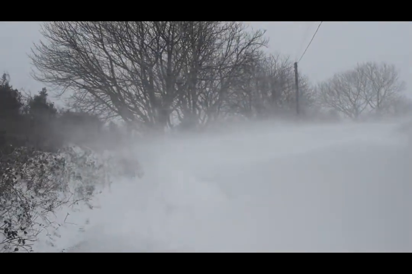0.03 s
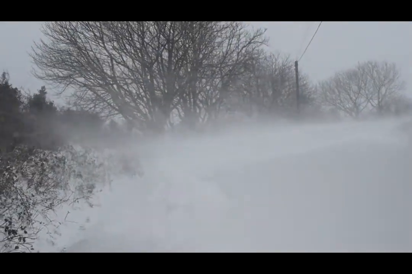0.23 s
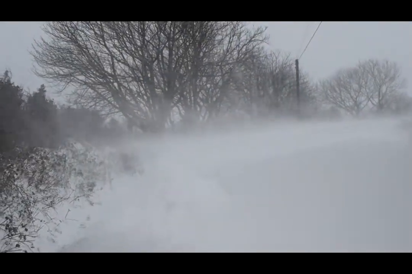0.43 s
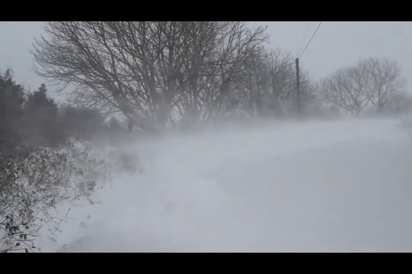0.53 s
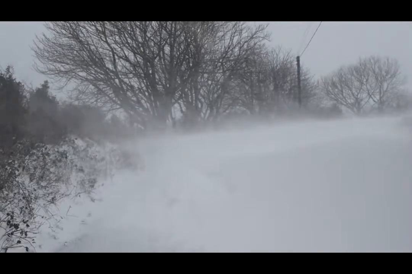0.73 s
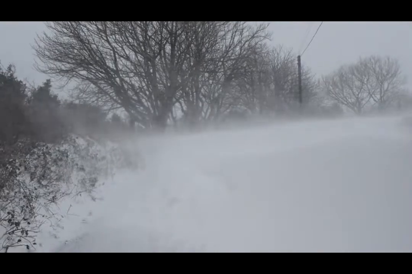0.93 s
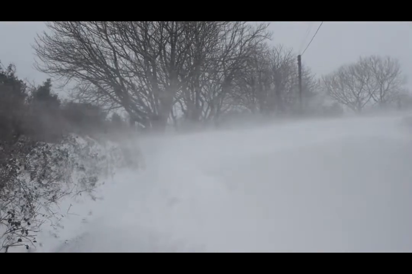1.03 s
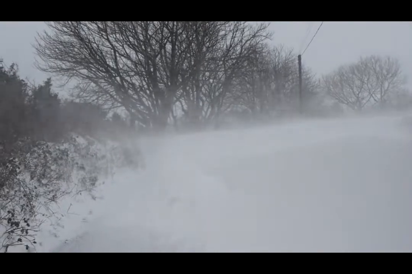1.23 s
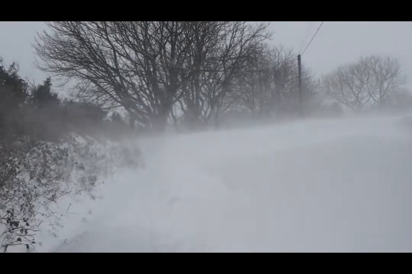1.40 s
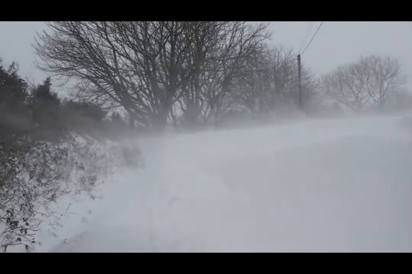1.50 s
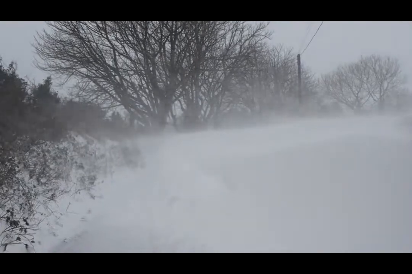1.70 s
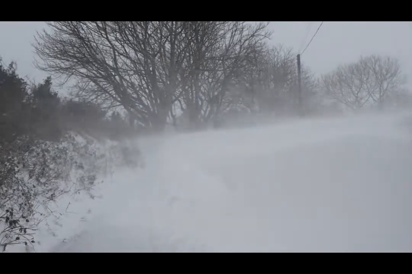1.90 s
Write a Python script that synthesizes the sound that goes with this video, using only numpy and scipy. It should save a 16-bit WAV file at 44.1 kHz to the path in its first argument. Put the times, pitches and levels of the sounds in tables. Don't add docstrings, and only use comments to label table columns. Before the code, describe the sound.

Wind buffets a small camera microphone on a snowy road. A low flutter opens over airy roar and snow hiss; from 0.2 to 0.5 s hard, distorted thumps tear at the right side. A strong gust hits at 0.7-0.8 s, more at 0.9 with a sharp snap at 0.96, then blows at 1.33 and 1.47-1.6. The background ducks under gusts, then creeps back as light left-side flutters end it.

```python
import sys
import numpy as np
from scipy import signal
from scipy.io import wavfile
from scipy.ndimage import uniform_filter1d

SR = 44100
rng = np.random.default_rng(int(sys.argv[2]) if len(sys.argv) > 2 else 0)


def decibels_to_gain(level_db):
    exponent = np.asarray(level_db, float) / 20
    return 10 ** exponent


def store_pcm(level_fs):
    pcm = np.round(np.clip(level_fs, -1, 1) * 32767).astype(np.int16)
    wavfile.write(sys.argv[1], SR, np.atleast_2d(pcm).T)


N = 85995

# (frequency [Hz], density [dB per Hz])
ROAR_SPECTRUM = [(250, -4), (500, -5), (1050, 1.5), (1350, -3.5), (1900, -4.5), (5200, -18), (8300, -16.5),
                 (15500, -33.5)]
# (frequency [Hz], correlation [-1 to 1])
ROAR_LIKENESS = [(60, -0.08), (180, -0.67), (550, 1), (1650, 0.58), (4970, -0.25), (15000, 0.074)]
# (time [s], lift [dB])
SNOW_DRIFT = [(0, 0), (.08, 0), (.16, 3), (.22, 1), (.35, 2), (.39, 9), (.44, 2), (.56, -3), (.82, 1),
              (.885, 4), (.96, 0), (1.1, 1), (1.14, 4), (1.21, 0), (1.45, 1), (1.5, 5), (1.6, 2),
              (1.95, -1)]
# (time [s], peak level [dB], left minus right [dB])
SNOW_GRAINS = [
    (0.329, -33.5, -22),
    (1.124, -40, -12),
    (1.169, -45, -4),
    (1.327, -40, -20),
    (1.484, -33, -4),
    (1.507, -31.5, -9),
    (1.59, -41, -27),
]
# (time [s], peak level [dB], corner frequency [Hz])
SHARP_EDDIES = [(.214, 5.5, 650), (.217, 15.5, 750), (0.303, 5, 1500), (0.329, 4, 2000), (0.375, 9.5, 1480),
                (.398, 2.5, 1280), (0.466, -3, 1830), (.479, -7, 500), (.64, -5.5, 604), (0.861, -3, 650),
                (0.959, 18, 1190), (0.9888, 3.5, 1510), (.991, -9, 700), (1.003, -5.5, 530),
                (1.051, -1.5, 1606), (1.059, -4.5, 298), (1.126, -10, 604), (1.157, -5, 960),
                (1.298, -3.5, 450), (1.321, 0, 630), (1.333, -1.5, 920), (1.4648, 6, 1020),
                (1.467, -1.5, 1100), (1.524, 5.5, 970), (1.619, -16, 610)]
# (start [s], length [s], level after gain control [dB], eddy corner [Hz])
LEFT_GUSTS = [(.12, .15, -30, 152), (.31, 0.033, -20.5, 200), (.355, 0.073, -27.5, 249),
              (.39, 0.07, -46, 296), (.52, 0.016, -36, 250), (.58, 0.019, -31.5, 290),
              (.72, 0.072, -27.5, 305), (.92, 0.072, -31, 314), (1.05, .04, -40, 250),
              (1.18, .04, -40, 250), (1.26, 0.03, -33.5, 285), (1.33, 0.088, -35.5, 200),
              (1.52, 0.058, -21.5, 378), (1.552, 0.052, -21, 523), (1.62, 0.02, -29, 296),
              (1.652, 0.0068, -14, 486), (1.68, 0.011, -16.5, 360), (1.76, 0.0076, -19.5, 248),
              (1.84, 0.027, -24.5, 200), (1.93, .02, -22.5, 347)]
# (start [s], length [s], level after gain control [dB], eddy corner [Hz])
RIGHT_GUSTS = [(0, 0.11, -24.5, 200), (.152, .035, -18, 231), (.197, 0.037, -5.5, 456),
               (.236, 0.051, -2.5, 1176), (.29, 0.035, -6.5, 800), (.337, 0.025, -8.5, 580),
               (.357, 0.017, -9.5, 1370), (.372, 0.038, -12.5, 637), (.42, 0.02, -10.5, 910),
               (.443, 0.0086, -5.5, 1660), (.458, 0.021, -15.5, 733), (.485, 0.033, -29.5, 324),
               (.6, 0.096, -22.5, 240), (.702, 0.089, -2, 1190), (.793, 0.023, -17.5, 970),
               (.815, 0.17, -20.5, 200), (.878, 0.057, -11, 400), (.901, 0.057, -8, 1370),
               (.962, 0.073, -36, 252), (1.0525, 0.0031, -13, 1690), (1.043, 0.11, -21, 266),
               (1.65, 0.27, -30, 164), (1.165, 0.037, -26, 200), (1.295, 0.033, -19, 376),
               (1.33, 0.02, -7, 543), (1.355, 0.02, -16, 344), (1.444, .018, -10.5, 220),
               (1.466, 0.027, -6, 600), (1.497, .13, -14.5, 423), (1.547, 0.013, -9, 198)]
# (time [s], gain [dB])
CAMERA_GAIN = [(0, 0), (.17, 1), (.285, -13), (.44, -13), (.46, -19), (.56, -19.5), (.692, -7), (.71, -12),
               (.77, -15), (.81, -20), (.89, -17), (.95, -19), (.975, -25), (1.16, -15), (1.19, -16),
               (1.33, -9), (1.7, -7), (1.95, -1)]

ROAR_DB, PATCH_DB, FLICKER_DB = -26, 0.7, 0.8
HISS_HZ = 5570
GRAIN_HZ, GRAIN_S, GRAIN_DB = 7300, 0.0017, 3
EDDIES_PER_CYCLE, EDDY_SPREAD_DB = 1.528, 4.5
LUMP_DB, LUMP_HZ = 1, 63
FINE_DB, FINE_RATIO = -18, 2.005
RISE_CYCLES, FALL_CYCLES = 1.6, 2.5
MURMUR_LEFT_DB, MURMUR_RIGHT_DB, MURMUR_HZ = -43, -44, 200
BASS_CUT_HZ = 110
PORT_HZ, PORT_WIDTH_HZ, PORT_DB = 980, 300, -4
UPPER_HZ, UPPER_WIDTH_HZ, UPPER_DB = 1950, 700, -1
KNEE, CLIP = 2.2, 1.0


def evened(x):
    return x / np.sqrt(np.mean(x ** 2) + 1e-20)


def read(points, hz):
    f, value = np.transpose(points)
    return np.interp(np.log(hz + 1), np.log(f + 1), value)


def passed(x, hz, kind, order=2):
    return signal.sosfilt(signal.butter(order, hz, kind, fs=SR, output="sos"), x)


def ring(x, hz, width_hz):
    return signal.lfilter(*signal.iirpeak(hz, hz / width_hz, SR), x)


def roar():
    frames, hz = N // 128 + 5, np.fft.rfftfreq(512, 1 / SR)
    a, b, c, d, patches = rng.standard_normal((frames, 257, 5)).T
    patches = uniform_filter1d(patches, size=6, axis=0)
    patches = evened(uniform_filter1d(patches, size=20, axis=1))
    flicker = evened(uniform_filter1d(rng.standard_normal(frames), size=6))

    same = np.clip(read(ROAR_LIKENESS, hz), -1, 1)[:, None]
    left = a + 1j * b
    right = same * left + np.sqrt(1 - same ** 2) * (c + 1j * d)

    spectrum_db = read([(60, -31)] + ROAR_SPECTRUM, hz)[:, None]
    drift_db = np.interp(np.arange(frames) * 128 / SR, *np.transpose(SNOW_DRIFT))
    hiss_share = 1 / (1 + (HISS_HZ / (hz + 1)) ** 4)
    level_db = spectrum_db + PATCH_DB * patches + FLICKER_DB * flicker + np.outer(hiss_share, drift_db)
    noise = signal.istft(np.array([left, right]) * decibels_to_gain(level_db), nperseg=512, noverlap=384)[1][:, :N]
    return decibels_to_gain(ROAR_DB) * evened(noise)


def grains():
    t, out = np.arange(N) / SR, np.zeros((2, N))
    noise = passed(rng.standard_normal((2, N)), GRAIN_HZ, "high")
    for s, db, pan in SNOW_GRAINS:
        sides = decibels_to_gain(np.array([[db + GRAIN_DB + pan / 2], [db + GRAIN_DB - pan / 2]]))
        out += sides * (t > s) * np.exp(-abs(t - s) / GRAIN_S)
    return noise * out


def snaps():
    t, out = np.arange(N) / SR, np.zeros(N)
    signs = (-1.) ** np.arange(len(SHARP_EDDIES))
    for (s, db, hz), sign in zip(SHARP_EDDIES, signs):
        u = np.pi * hz * (t - s)
        pulse = np.exp(0.6 - np.hypot(u, 0.6)) * np.cos(1.11 * u + 0.84)
        out += sign * decibels_to_gain(db - 1) * pulse
    return out


def port(gusts, murmur_db):
    t, out = np.arange(N) / SR, np.zeros(N)
    chance = rng.random(N)
    size = rng.standard_normal(N) * decibels_to_gain(EDDY_SPREAD_DB * np.minimum(rng.exponential(1, N), 2.5))
    lumps = decibels_to_gain(LUMP_DB * evened(passed(rng.standard_normal(N), LUMP_HZ, "low")))
    murmur = (0.028, N / SR, murmur_db, MURMUR_HZ)
    for start, length, db, hz in [murmur] + gusts:
        a, b = max(int((start - 0.03) * SR), 0), int((start + length + 0.04) * SR)
        strike = np.clip((EDDIES_PER_CYCLE * hz / SR - chance[a:b]) * 300, 0, 1)
        hits = size[a:b] * (0.065 + strike)
        coarse = passed(hits, hz, "low", order=3)
        fine = passed(hits[::-1], FINE_RATIO * hz, "low", order=3)
        eddies = passed(coarse + decibels_to_gain(FINE_DB) * fine, BASS_CUT_HZ, "high") * lumps[a:b]

        rise = np.minimum((t[a:b] - start) * hz / RISE_CYCLES, 0)
        fall = np.minimum((start + length - t[a:b]) * hz / FALL_CYCLES, 0)
        shape = np.exp(rise + fall)
        gust = shape * eddies
        out[a:b] += decibels_to_gain(db) * gust / np.sqrt(np.sum(gust ** 2) / np.sum(shape ** 2))
    upper = decibels_to_gain(UPPER_DB) * ring(out, UPPER_HZ, UPPER_WIDTH_HZ)
    return out + upper + decibels_to_gain(PORT_DB) * ring(out, PORT_HZ, PORT_WIDTH_HZ)


def gain_curve():
    s, db = np.transpose(CAMERA_GAIN)
    return decibels_to_gain(np.interp(np.arange(N) / SR, s, db))


def scene():
    left = port(LEFT_GUSTS, MURMUR_LEFT_DB)
    right = port(RIGHT_GUSTS, MURMUR_RIGHT_DB) + snaps()
    return roar() + (np.array([left, right]) + grains()) / gain_curve()


def low_pass(x):
    return signal.sosfilt(signal.butter(12, 15690, fs=SR, output="sos"), x)


def record(dry):
    squeezed = KNEE * np.tanh(dry * gain_curve() / KNEE)
    return low_pass(np.clip(squeezed, -CLIP, CLIP))


dry = scene()
out = record(dry)
store_pcm(out)
```